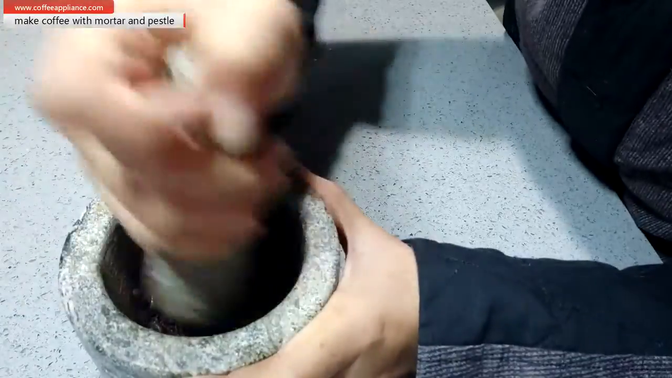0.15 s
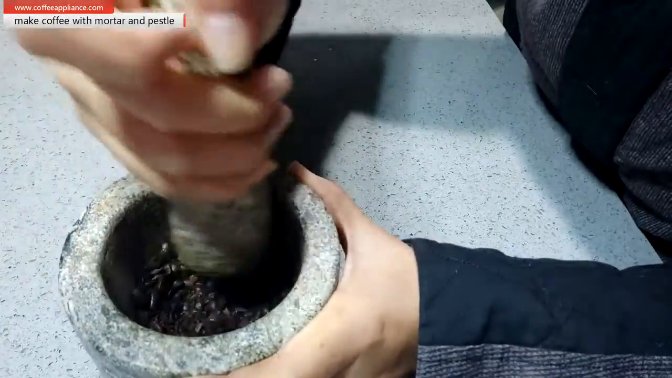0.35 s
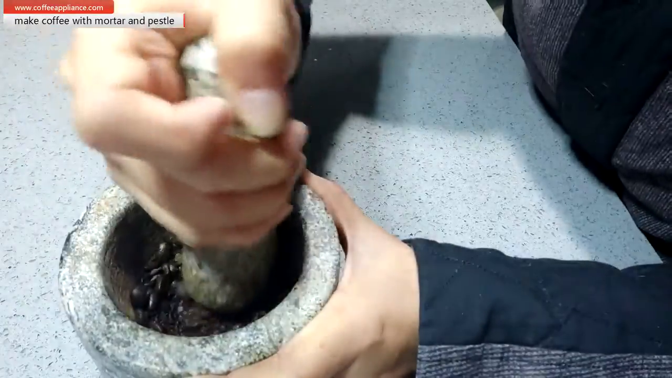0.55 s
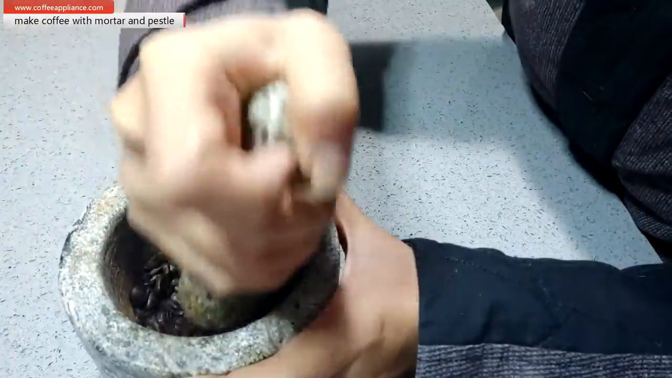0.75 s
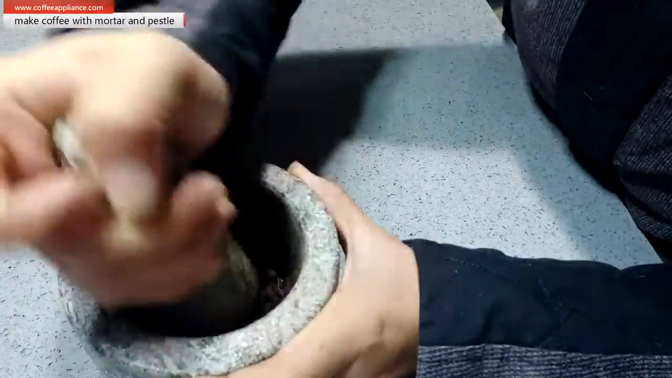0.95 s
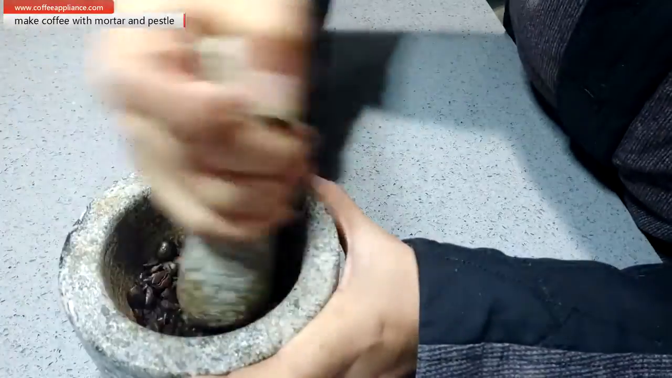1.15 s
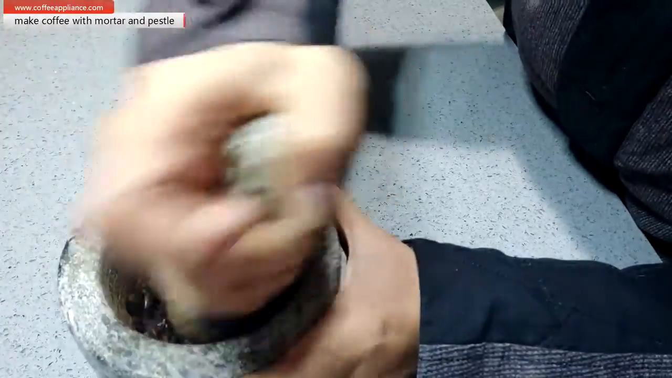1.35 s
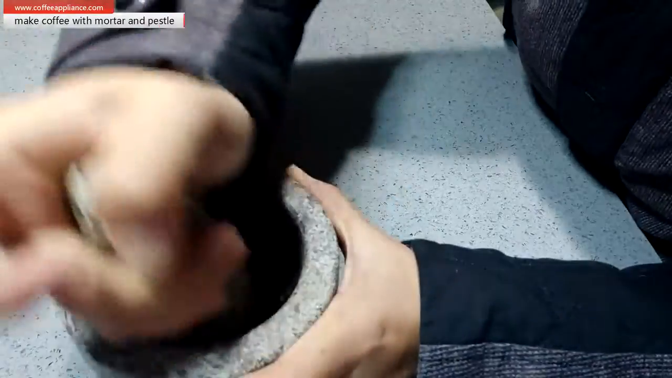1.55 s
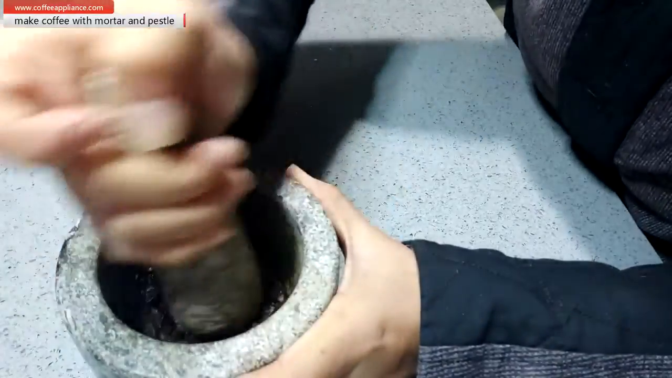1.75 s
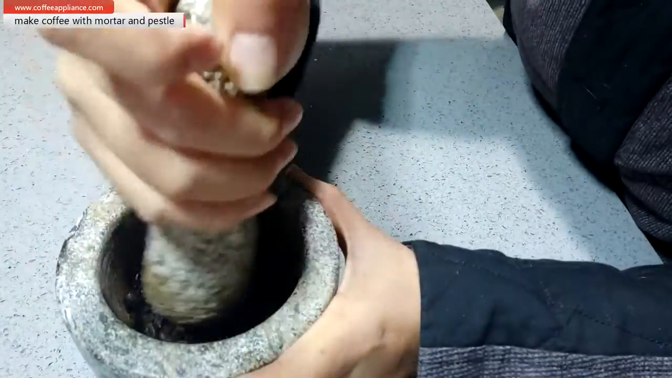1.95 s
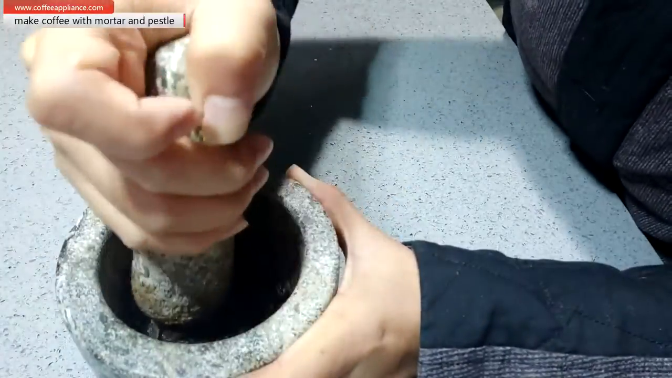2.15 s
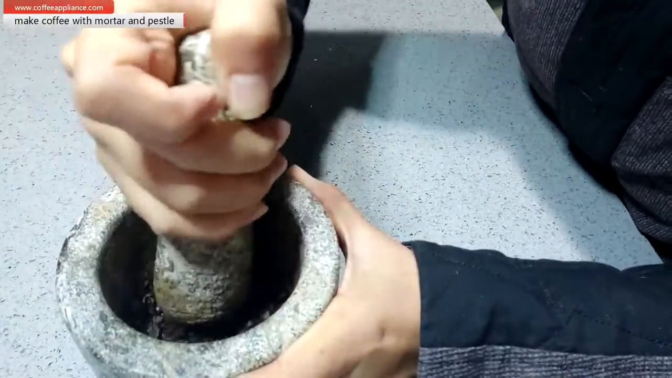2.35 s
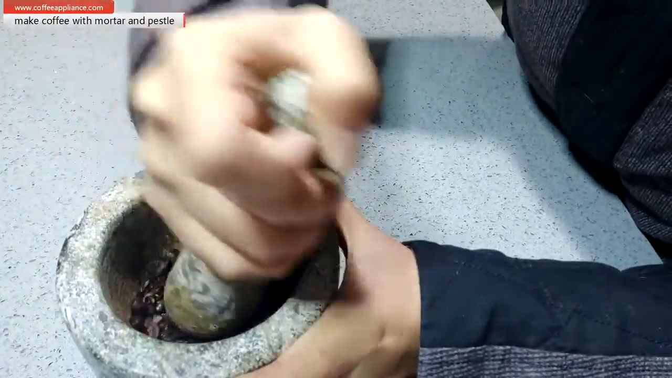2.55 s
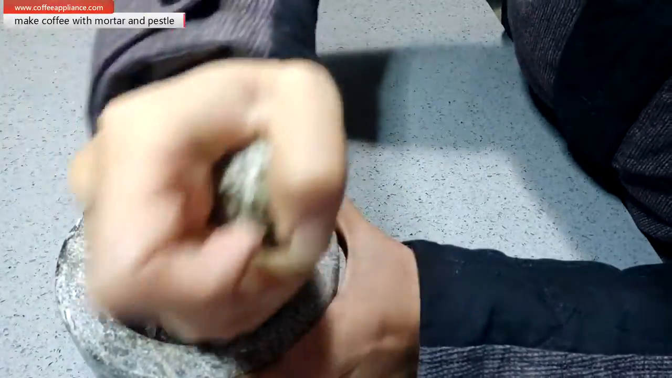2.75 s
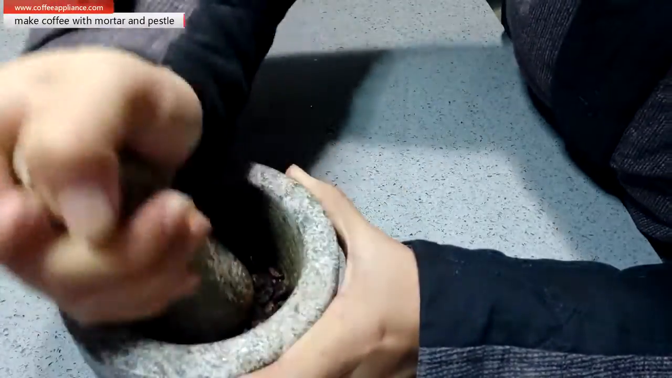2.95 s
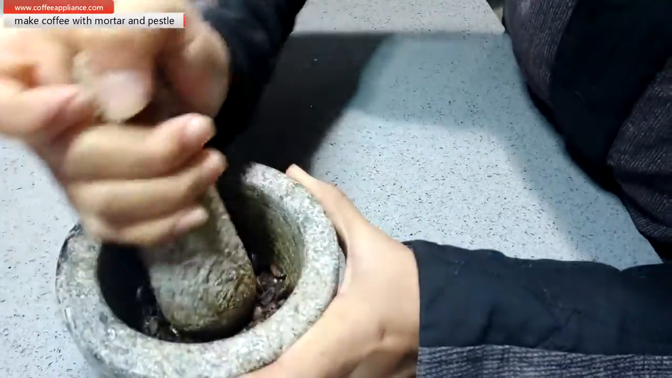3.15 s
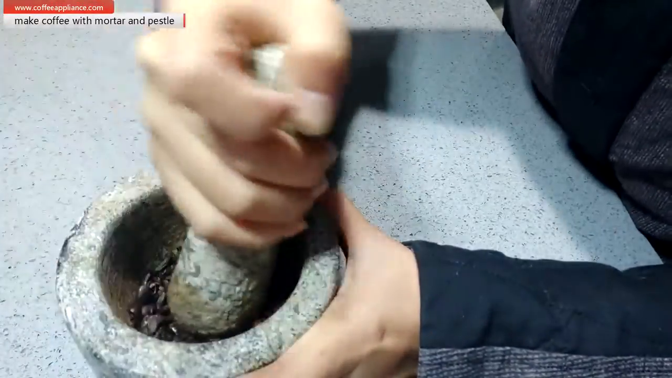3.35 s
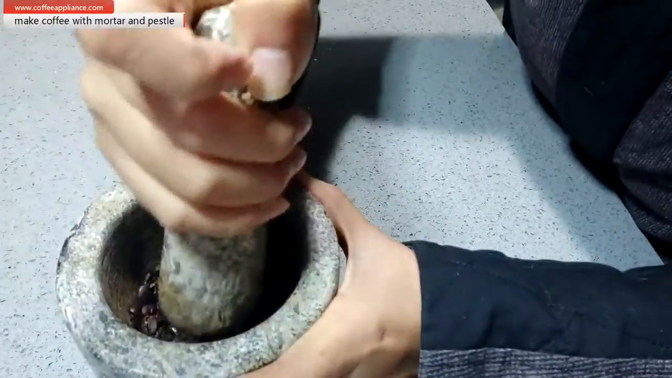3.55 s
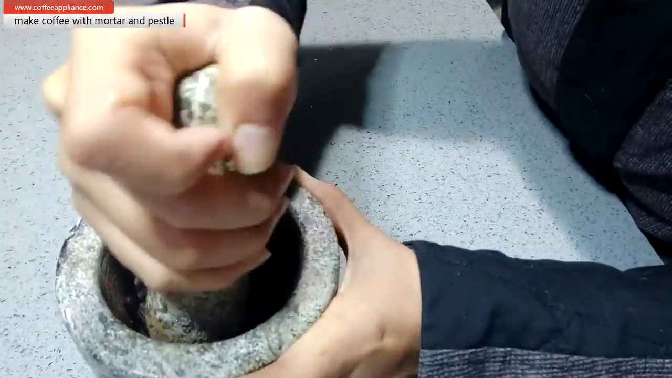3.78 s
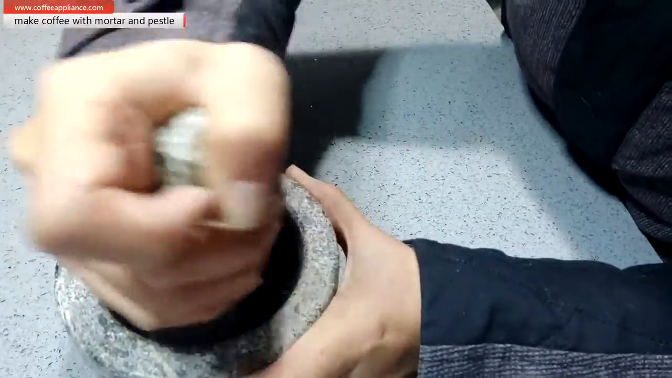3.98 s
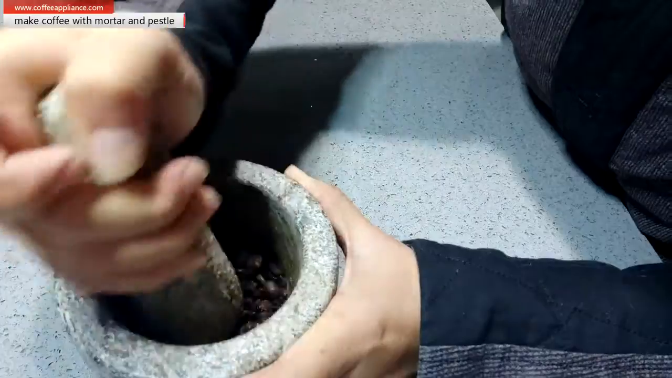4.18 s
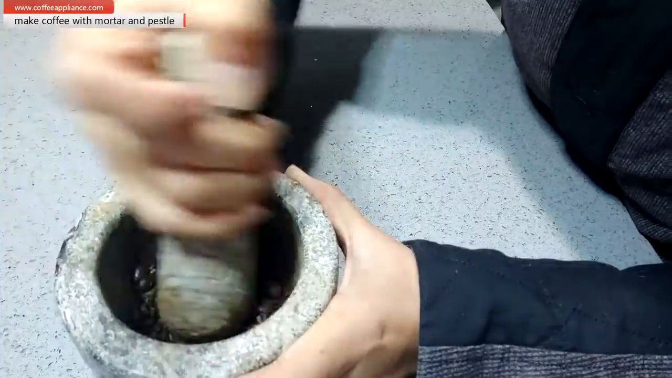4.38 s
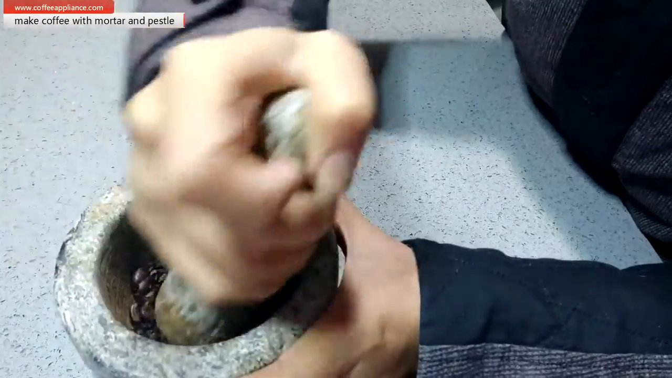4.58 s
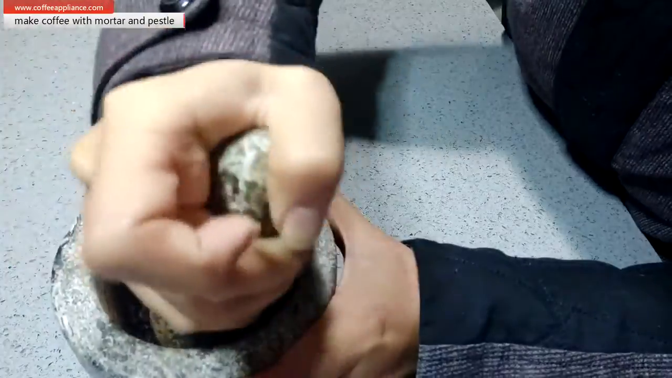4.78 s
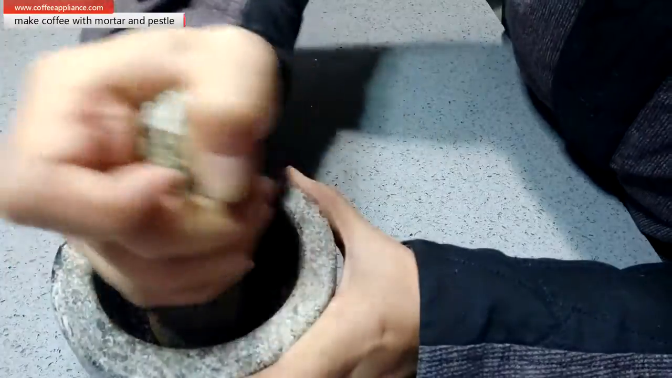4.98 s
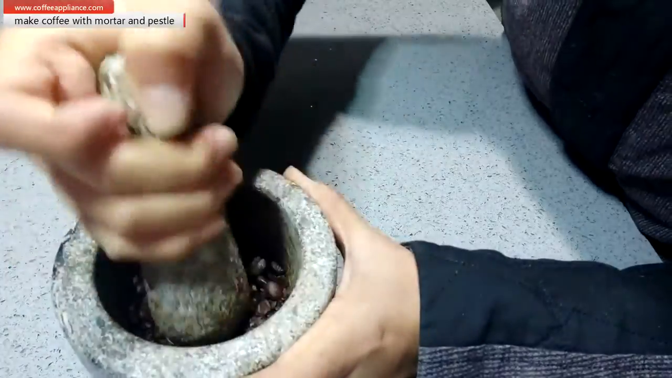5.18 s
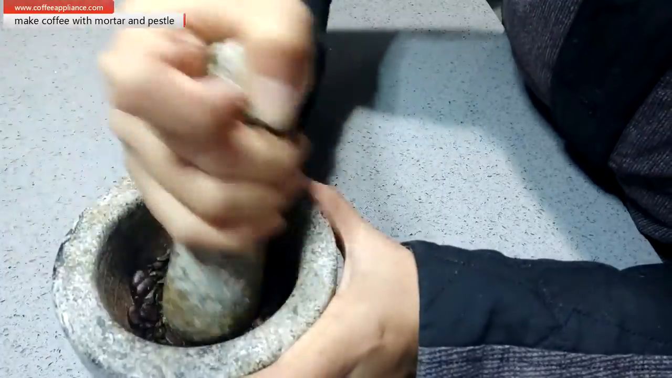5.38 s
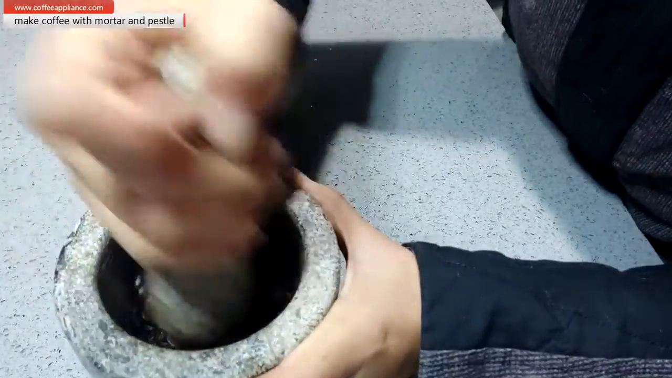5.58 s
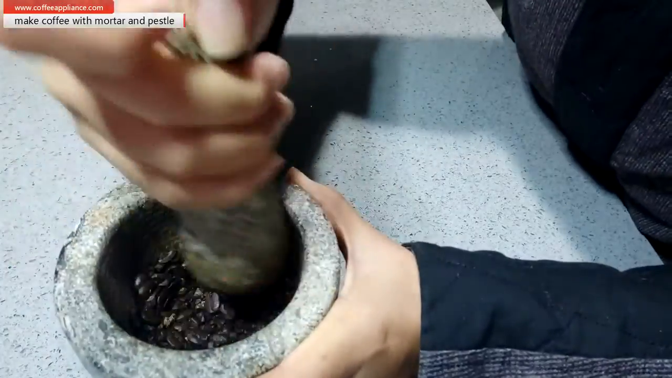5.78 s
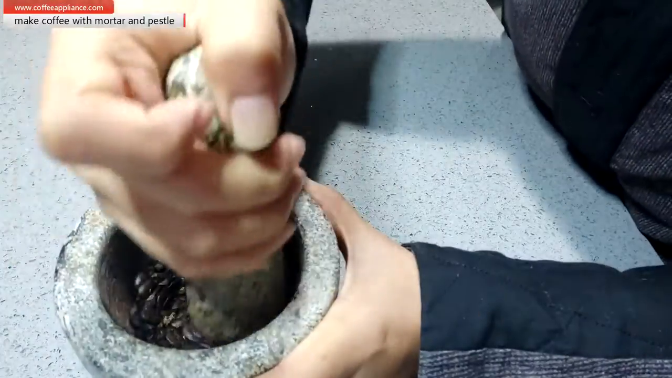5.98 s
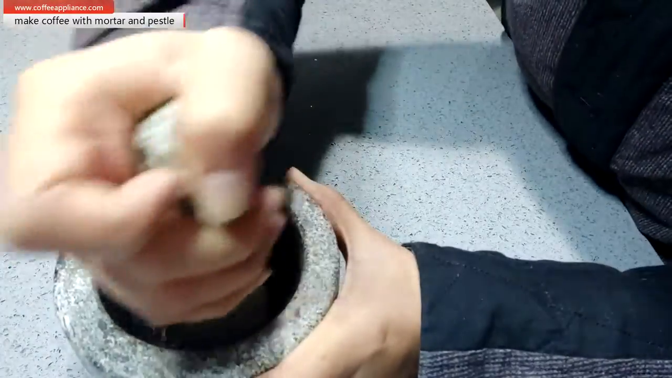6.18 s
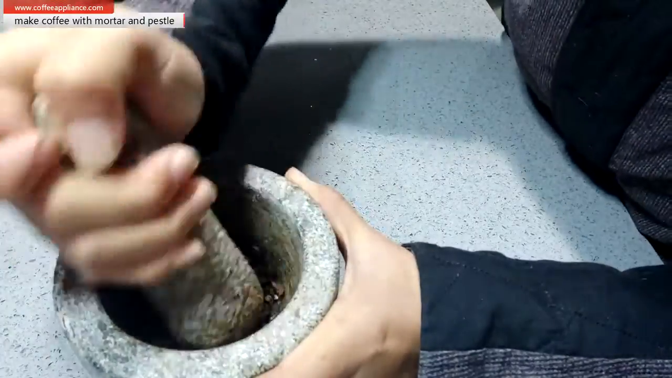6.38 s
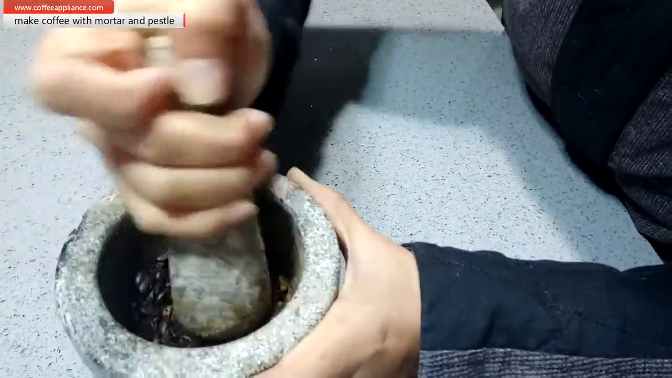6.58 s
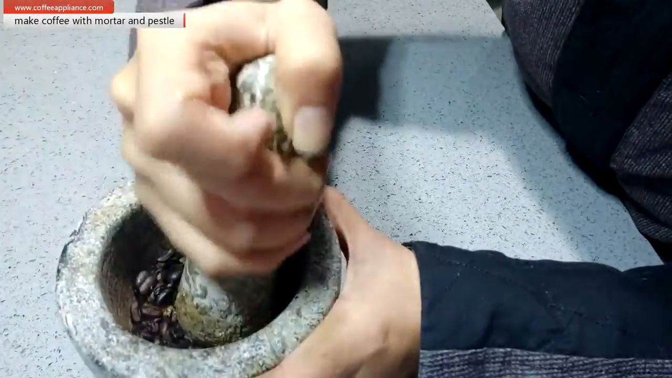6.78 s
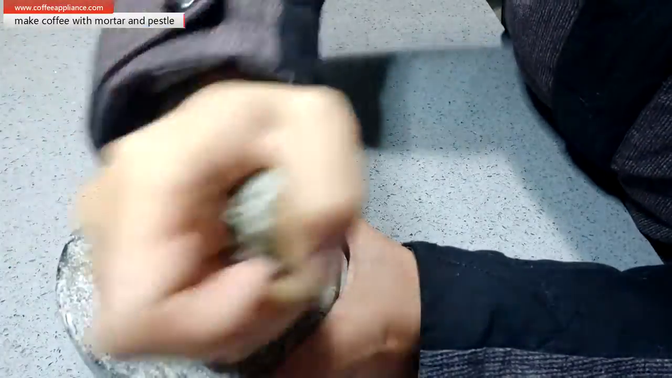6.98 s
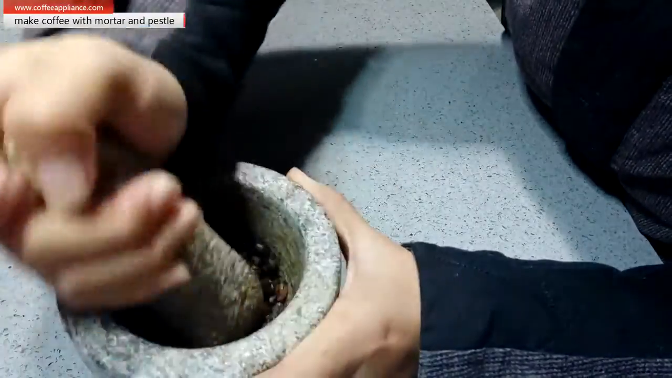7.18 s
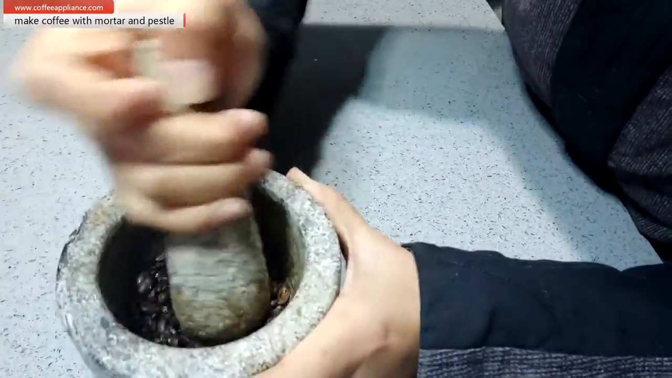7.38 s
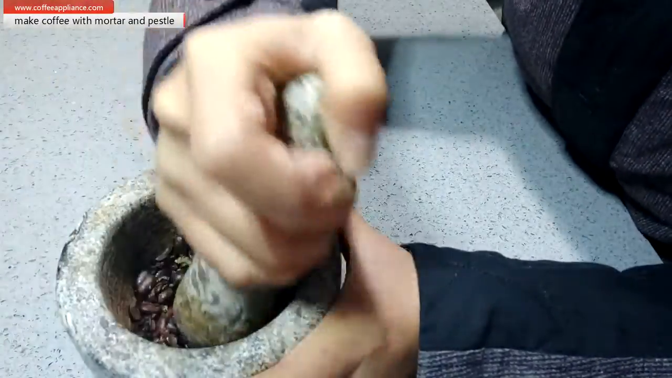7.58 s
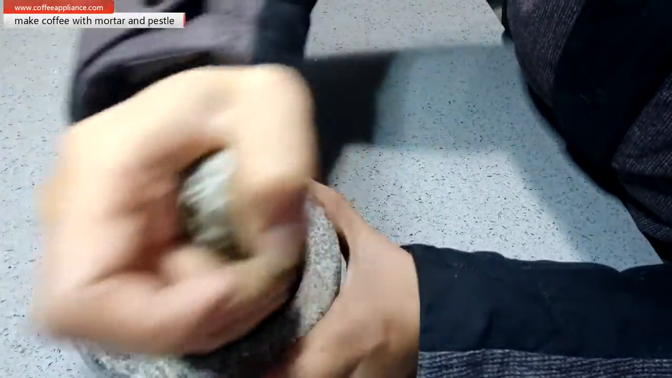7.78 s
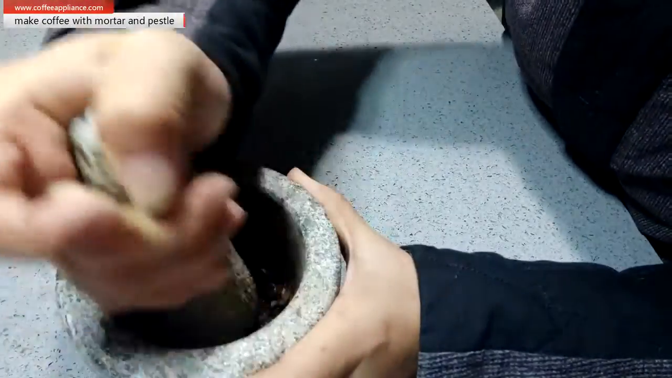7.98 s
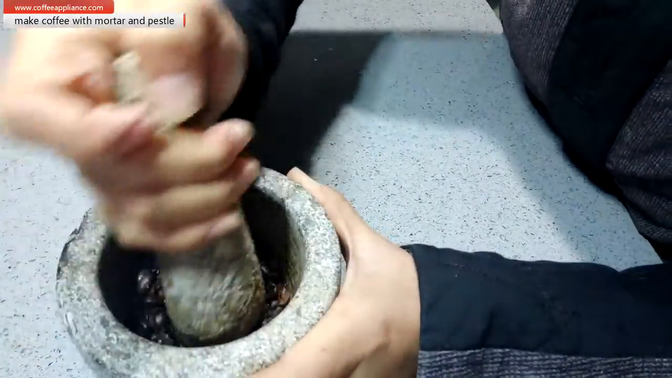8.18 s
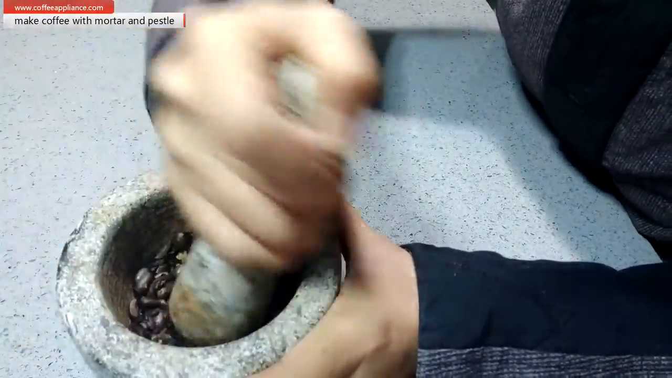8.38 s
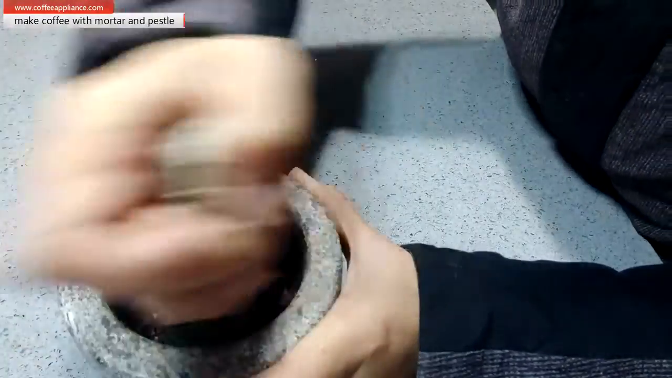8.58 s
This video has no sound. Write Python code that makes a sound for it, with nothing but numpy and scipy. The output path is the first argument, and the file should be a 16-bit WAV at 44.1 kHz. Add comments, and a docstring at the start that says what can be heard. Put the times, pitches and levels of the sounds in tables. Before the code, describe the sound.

A stone pestle works through roasted coffee beans in a stone mortar on a table. Gritty crumbling swells and eases in uneven sweeps, with crisp snaps over a low hollow rumble. Brief lifts leave short gaps, and the pestle sometimes knocks the bowl, most loudly in a quick double clack at the end. Very close, wide and treble-heavy stereo in a small room with faint steady noise.

```python
"""A stone pestle grinds roasted coffee beans in a stone mortar held on a table in a small, softly noisy room.
From the start each sweep swells and eases: crumbs crush in stick-slip bursts, the pestle's pushes excite
mortar and table modes in a hollow rumble, and beans snap as impulses that ring briefly.
The pestle is lifted a few times; from half a second on it sometimes knocks, with the two loudest clacks near
the end. Walls and bowl answer with diffuse reflections, and each microphone port adds its own treble resonance."""
import sys
import numpy as np
from scipy import signal
from scipy.fft import rfft, irfft
from scipy.io import wavfile
from scipy.ndimage import uniform_filter1d

SR = 44100
rng = np.random.default_rng(int(sys.argv[2]) if len(sys.argv) > 2 else 0)


def pcm_store(signal):
    """Save signal as 16-bit PCM."""
    levels = np.round(np.clip(np.atleast_2d(signal), -1, 1) * 32767)
    wavfile.write(sys.argv[1], SR, levels.astype(np.int16).T)


N = 380583  # length in samples
TIME = np.arange(N) / SR  # s
TOP_HZ = 15800  # upper edge of the sound


def undb(db):
    """Decibel law: convert a level in dB to an amplitude gain."""
    return 10 ** (np.asarray(db) / 20)


def unit(x):
    """Energy normalization: scale a response to unit energy."""
    return x / np.sqrt(np.sum(x ** 2, axis=-1, keepdims=True))


def steady(x):
    """Power normalization: scale a signal to rms 1."""
    return x / np.sqrt(np.mean(x ** 2))


def through(x, response):
    """Linear superposition: convolve a sound with an impulse response."""
    convolved = signal.oaconvolve(np.atleast_2d(x), np.atleast_2d(response), axes=-1)
    return convolved[:, :np.shape(x)[-1]]


def colour(points, size=2048):
    """Minimum phase: fold the cepstrum of a (Hz, dB) outline to obtain a causal impulse response."""
    hz, db = np.transpose(points)
    grid_hz = np.maximum(np.arange(size // 2 + 1) * SR / size, 1)
    outline_db = np.interp(np.log(grid_hz), np.log(hz), db)
    cepstrum = irfft(np.log(undb(outline_db)))
    cepstrum[1:size // 2] *= 2
    cepstrum[size // 2 + 1:] = 0
    return irfft(np.exp(rfft(cepstrum)))


def walk(rate_hz):
    """Band-limited fluctuation: smoothed random steps of rms 1, about rate_hz turns a second."""
    hold = max(int(SR / rate_hz), 1)
    steps = np.repeat(rng.standard_normal(N // hold + 1), hold)
    return steady(uniform_filter1d(steps, hold)[:N])


def even(x, span_s):
    """Short-term power: hold a grain stream near power 1 over span_s, keeping its finer bursts."""
    power = uniform_filter1d(np.atleast_2d(x ** 2).mean(axis=0), int(span_s * SR))
    return x / np.sqrt(np.maximum(power, 0) + power.mean() / 100)


def blows(times_s, sizes):
    """Impulsive excitation: one single-sample impulse at each time."""
    at = np.round(np.asarray(times_s) * SR).astype(int)
    return np.bincount(np.clip(at, 0, N - 1), sizes, N)


def grains(rate_hz, spread_db):
    """Random point process: impulses of either sign, many small and a few large."""
    chance = rng.random(N)
    size = np.minimum(rng.exponential(size=N), 4)
    return (chance < rate_hz / SR) * undb(spread_db * size) * rng.choice([-1, 1], N)


def two_ports(x, scatter_db=4.0, lag_samples=5):
    """Interaural-type cues: each fracture reaches the two ports with its own lag and balance."""
    at = np.flatnonzero(x)
    lag = rng.integers(-lag_samples, lag_samples + 1, len(at))
    balance_db = scatter_db * rng.standard_normal(len(at))
    ports = []
    for side in (1, -1):
        arrival_s = (at + side * lag / 2) / SR
        ports.append(blows(arrival_s, x[at] * undb(side * balance_db)))
    return np.array(ports)


def tail(t60_s, build_s):
    """Diffuse field: independent decaying noise at each port, with build-up time constant build_s."""
    t = TIME[:int(min(t60_s, .5) * SR) + 8]
    envelope = undb(-60 * t / t60_s) * (1 - np.exp(-t / build_s))
    return unit(rng.standard_normal((2, len(t))) * envelope)


def scatter(x, t60_s, build_s, moves_hz=12):
    """Time-varying reflection: the echo pattern changes as hand and pestle move over the bowl."""
    hop = int(SR / moves_hz)
    out = np.zeros((2, N + SR))
    fade = np.sin(np.pi * np.arange(2 * hop) / (2 * hop))  # overlapping squares sum to one
    for at in range(0, N, hop):
        piece = x[:, at:at + 2 * hop]
        echo = signal.fftconvolve(piece * fade[:piece.shape[1]], tail(t60_s, build_s), axes=-1)
        out[:, at:at + echo.shape[1]] += echo
    return out[:, :N]


def cushioned(force, soft_hz):
    """First-order low-pass: a layer of grounds lengthens the push and takes off its top."""
    return signal.lfilter(*signal.butter(1, min(soft_hz, SR / 4), fs=SR), force)


# Spectrum of the quiet room. Each row: frequency in Hz, relative spectral level in dB.
ROOM_SPECTRUM = [(30, -9), (150, -5.5), (260, -11), (900, -17), (2000, -29), (5000, -44), (16000, -44.5)]
ROOM_DB = -51.5  # rms level before the ports


def room_tone():
    """Partial coherence: steady room noise whose bass is shared by both ports while its hiss is not."""
    noise = rng.standard_normal((3, N))
    hiss = noise[:2] - cushioned(noise[:2], 560)
    shared_bass = cushioned(noise[2], 460)
    return undb(ROOM_DB) * steady(through(hiss + shared_bass, colour(ROOM_SPECTRUM)))


def swell(times_s, levels_db, rise_s, fall_s):
    """Power envelope: a gesture rises from 60 dB below, passes through its levels and dies away."""
    outline_s = [times_s[0] - rise_s, *times_s, times_s[-1] + fall_s]
    outline_db = [levels_db[0] - 60, *levels_db, levels_db[-1] - 60]
    return undb(np.interp(TIME, outline_s, outline_db, left=-200, right=-200)) ** 2


# Sweeps of the pestle through the beans. Each row: start in seconds, hardest press in seconds,
# end in seconds, relative crushing level in dB, relative level of the mortar's shaking in dB.
PESTLE_SWEEPS = [(0.0, 0.048, 0.21, -35.5, -32), (0.567, 1.23, 1.36, -30.5, -31.5),
                 (1.415, 1.535, 1.82, -30.5, -30.5), (2.314, 2.97, 3.435, -32.5, -32),
                 (3.768, 3.96, 4.0, -33, -33.5), (4.104, 4.55, 4.84, -29.5, -27.5),
                 (5.067, 5.36, 5.5, -29, -28.5), (5.963, 6.32, 6.52, -36.5, -36),
                 (6.505, 6.903, 7.13, -27.5, -28), (7.142, 7.317, 7.82, -29, -30.5),
                 (7.922, 8.523, 8.48, -34.5, -32.5)]
# Pieces of bean caught and crunched to powder. Each row: start in seconds, length in seconds,
# relative crushing level in dB, relative level of the mortar's shaking in dB.
CAUGHT_PIECES = [(0.02, 0.042, -28, -32), (0.197, 0.016, -36.5, -33), (.603, 0.036, -24.5, -29.5),
                 (0.671, 0.052, -26.5, -30), (0.788, 0.041, -32, -32.5), (0.934, 0.068, -26, -32),
                 (1.007, 0.0091, -31, -36), (1.172, .055, -21.5, -32.5), (1.268, 0.063, -27, -26),
                 (1.448, 0.052, -29.5, -36), (1.554, 0.021, -37, -25.5), (1.735, 0.038, -33, -37),
                 (1.872, 0.02, -43.5, -43), (1.922, 0.022, -40, -37), (2.195, .025, -26, -34.5),
                 (2.335, 0.04, -29.5, -33.5), (2.417, 0.019, -25.5, -33), (2.48, 0.044, -31, -36),
                 (2.563, 0.042, -28, -31), (2.928, 0.1, -26.5, -26.5), (3.147, 0.032, -27.5, -33),
                 (3.378, 0.021, -33.5, -54), (3.486, 0.012, -34, -54), (3.794, 0.043, -31, -33.5),
                 (3.924, .065, -31, -30), (4.122, 0.078, -31, -29), (4.305, 0.013, -33.5, -28),
                 (4.342, .075, -24.5, -32), (4.508, 0.091, -25, -23), (4.707, .04, -26, -23.5),
                 (4.951, 0.026, -35.5, -25.5), (5.05, 0.045, -29.5, -26.5), (5.43, 0.042, -29, -27),
                 (5.552, 0.04, -32, -32), (5.642, .012, -39, -51), (5.974, .055, -32, -36.5),
                 (6.09, 0.0081, -30, -40), (6.135, 0.037, -32.5, -42), (6.248, 0.017, -31.5, -23.5),
                 (6.302, .025, -29, -36), (6.522, 0.058, -29, -35.5), (6.604, 0.027, -28, -42),
                 (6.789, 0.027, -28, -26.5), (7.051, 0.032, -25.5, -25), (7.154, 0.018, -32.5, -24),
                 (7.222, 0.031, -28.5, -26.5), (7.628, 0.021, -34, -26), (7.805, 0.046, -28.5, -28.5),
                 (8.148, 0.033, -28.5, -25.5), (8.274, 0.026, -36.5, -48), (8.38, 0.018, -28, -45),
                 (8.463, 0.064, -28, -27), (8.544, 0.073, -38, -27)]
# a sweep bites, swells to its hardest point, eases off and lets go
BITE_S, SWELL_DB, EASE_DB, LET_GO_S = 0.13, 8.5, 8, 0.22
CRUNCH_ATTACK_S, CRUNCH_RELEASE_S = 0.051, 0.093


def effort(column):
    """Addition of powers: sweeps plus short crunches give the crushing (0) or shaking (1) level in dB."""
    power = 0
    for start, hardest, end, *levels in PESTLE_SWEEPS:
        db = levels[column]
        sweep_db = [db - SWELL_DB, db, db - EASE_DB]
        power = power + swell([start, hardest, end], sweep_db, BITE_S, LET_GO_S)
    for start, length, *levels in CAUGHT_PIECES:
        crunch_db = [levels[column]] * 2
        power = power + swell([start, start + length], crunch_db, CRUNCH_ATTACK_S, CRUNCH_RELEASE_S)
    return 10 * np.log10(power)


def fragment(hz, skirt_db=-9, octaves=1.0):
    """Damped resonance: a brittle piece of bean rings for a cycle or two around its own pitch."""
    outline = [(hz / 2 ** octaves, skirt_db), (hz, 0), (hz * 2 ** octaves, skirt_db)]
    return unit(colour(outline, size=256))


def crushing(level_db, rate_hz=600, spread_db=2.5, slip_db=6, slip_rate_hz=85, patchy_db=1.5,
             gain_db=-14, count=6):
    """Stick-slip friction: crumbs of several sizes fracture in bursts as the pestle sticks and slips."""
    slipping = np.tanh(2 * walk(slip_rate_hz) - 1.8)  # -1 stuck, +1 sliding; mostly stuck
    crumbs = 0
    for hz in np.geomspace(4000, 14000, count):
        sizes = grains(rate_hz, spread_db) * undb(slip_db * slipping + patchy_db * walk(35))
        crumbs = crumbs + through(two_ports(sizes), fragment(hz))
    return even(crumbs, 0.052) * undb(level_db + gain_db)


def judder(level_db, rate_hz=260, spread_db=2.5, gain_db=-1.0):
    """Random forcing: the pestle jerks over broken beans, a few hundred small pushes a second."""
    return even(grains(rate_hz, spread_db), 0.054) * undb(level_db + gain_db)


# Modes of mortar, pestle and table together.
# Each row: frequency in Hz, relative level in dB, undamped 60 dB decay time in seconds.
BODY_MODES = [(42.4, -18.5, 0.82), (63, -13, 0.51), (89.2, -10, 0.43), (163, -9.5, 0.036),
              (188.5, -9.5, 0.52), (235.1, 3.5, .19), (266, -1, 0.056), (299.6, -6.5, 0.12),
              (423, -7.5, 0.056), (491, -13, 0.039), (562, -18.5, 0.12), (636.7, -11, 0.14),
              (825, -18.5, 0.28), (951, -8.5, 0.067), (1142, -19.5, 0.05), (1411, -18.5, 0.091),
              (1710, -31, 0.15)]


def mortar(force, damping=1, apart_hz=1100):
    """Modal superposition: decaying sines ring together, the higher ones out of step at the two ports."""
    t = TIME[:SR // 2]
    ring = 0
    for k, (hz, db, t60_s) in enumerate(BODY_MODES):
        half_phase = min(0.038 + hz / apart_hz, np.pi / 2)  # rad
        shift = np.array([[.5], [-.5]]) * (-1) ** (k // 2) * half_phase
        decay = np.exp(-np.log(1000) * damping * t / t60_s)
        mode = unit(np.sin(2 * np.pi * hz * t + shift) * decay)
        ring = ring + (-1) ** k * undb(db) * mode
    return through(force, unit(ring))


# Spectrum of stone knocking or scraping through grounds. Each row: frequency in Hz, relative level in dB.
CLACK_SPECTRUM = [(120, -25.5), (300, 3), (600, 3), (1000, 0.5), (1600, -13), (2400, -28), (5000, -55),
                  (16000, -45)]


def rumble(shake_db, crack_s, jolt_db):
    """Forced vibration: pushes and drops through breaking beans ring the mortar, with a dull scrape."""
    pushes = judder(shake_db)
    jolts = cushioned(blows(crack_s, undb(jolt_db + 27.0)), 1100)
    body = mortar(cushioned(pushes + jolts, 1580))
    # stone rubbing on stone fills in between the modes
    scrape = through(undb(-14.5) * pushes, unit(colour(CLACK_SPECTRUM)))
    scrape = scrape + undb(4.0) * scatter(scrape, 0.043, 0.0019)
    walls = undb(-7.5) * scatter(scrape, 0.36, 0.0024)
    return body + scrape + walls


def chips(crush_db, above_db=3.0, spread_db=2.0, loudest_db=-22, ring_hz=12000, jolt_db=-12, count=60):
    """Load-dependent fracture: small pieces snap at random, louder the harder the pestle presses."""
    when, size, pitch = rng.random((count, 3)).T
    s = (np.arange(count) + when) / count * TIME[-1]
    db = np.interp(s, TIME, crush_db) + above_db + spread_db * (2 * size - 1)
    db = np.minimum(db, loudest_db)
    piece_hz = np.minimum(ring_hz * 2 ** (pitch - .5), TOP_HZ)
    return np.column_stack([s, db, piece_hz, db + jolt_db])


# Whole beans breaking. Each row: time in seconds, relative snap level in dB, ring of the piece in Hz,
# relative level in dB of the jolt as the pestle drops through it.
BEAN_CRACKS = [(.038, -23.5, 8240, -29), (.125, -22.5, 9400, -33.5), (.771, -22, 11300, -21),
               (.839, -19, 8600, -47), (1.064, -16, 7100, -20), (1.116, -17, 11900, -28),
               (1.129, -13, 13100, -34), (1.217, -20, 6500, -35), (1.227, -15, 7400, -30),
               (1.328, -18, 8500, -26), (1.408, -34, 13000, -45), (1.527, -17, 5400, -28),
               (1.579, -21.5, 10600, -33), (1.672, -19.5, 7400, -27), (1.792, -19.5, 11700, -36),
               (2.332, -16.5, 6400, -26), (2.494, -21, 10600, -33), (2.613, -16, 10400, -39),
               (2.646, -12, 11500, -22), (2.703, -14, 5070, -36), (2.724, -12.5, 13000, -37),
               (2.783, -22, 14000, -31), (2.832, -25, 9700, -38), (2.956, -13, 7600, -32),
               (3.099, -18.5, 7000, -40), (3.142, -10.5, 4800, -43), (3.16, -19, 10000, -29.5),
               (3.221, -13.5, 13300, -28.5), (3.297, -22, 6100, -52), (3.425, -20, 11700, -53),
               (3.756, -24.5, 12600, -53), (3.949, -17, 6600, -32), (4.065, -27, 9750, -30),
               (4.182, -14, 5700, -31), (4.253, -17, 7800, -27), (4.388, -13, 4160, -37),
               (4.407, -21, 8600, -44), (4.494, -12.5, 5400, -29), (4.618, -15.5, 8200, -39),
               (4.697, -14.5, 5660, -21.5), (4.72, -15.5, 5970, -38), (4.734, -16, 7600, -39),
               (4.79, -17, 9900, -41), (4.831, -22, 11400, -42), (4.956, -15.5, 8100, -26),
               (5.047, -12.5, 9200, -21), (5.172, -22.5, 5500, -26.5), (5.24, -20, 9600, -38),
               (5.279, -18, 7500, -32), (5.31, -23, 7660, -47), (5.351, -15, 10600, -27),
               (5.471, -23, 9200, -28), (6.25, -18, 10000, -40), (6.531, -15.5, 6540, -21.5),
               (6.7, -11, 5600, -26), (6.769, -15, 9300, -30), (6.868, -10, 4300, -33),
               (6.884, -20, 5600, -27), (6.899, -17, 7700, -49), (6.927, -13.5, 6850, -23),
               (7.249, -22, 8600, -32), (7.32, -16.5, 5770, -32), (7.354, -14.5, 6120, -28),
               (7.366, -16, 3730, -30), (7.516, -17, 4330, -27.5), (7.559, -17.5, 7300, -33),
               (7.635, -16.5, 9150, -33), (7.723, -17, 7100, -24), (7.811, -18.5, 6040, -25.5),
               (8.149, -20, 6600, -34), (8.387, -16, 7600, -44), (8.51, -19.5, 9800, -29)]


def fractures(crush_db):
    """Brittle failure: whole beans and smaller chips together, as columns of time, snap, ring and jolt."""
    return np.vstack([BEAN_CRACKS, chips(crush_db)]).T


def snaps(times_s, db, ring_hz, snap_db=6, split_db=-7, split_s=.003, crumble_db=-7, crumble_t60_s=0.071):
    """Cascading fracture: a bean snaps, splits again within milliseconds, and its pieces crumble."""
    t = TIME[:SR // 16]
    out = np.zeros((2, N + 2 * len(t)))
    pieces = steady(two_ports(grains(1800, 3.7))) * undb(crumble_db)
    fading = unit(undb(-60 * t / crumble_t60_s))
    chances = rng.random((len(times_s), 3))
    for s, level_db, hz, (wait, size, side) in zip(times_s, db, ring_hz, chances):
        at = int(np.clip(s * SR, 0, N - len(t)))
        burst = pieces[:, at:at + len(t)] * fading
        split_delay = int(split_s * (.2 + wait) * SR)
        # opposite lags at the ports, in samples, place the bean to one side
        for port, lag in enumerate((round(6 * side), round(6 - 6 * side))):
            burst[port, lag] += 1
            burst[port, min(split_delay - lag, len(t) - 1)] += undb(split_db * (0.5 + size))
        ringing = through(burst, fragment(hz, skirt_db=-8))
        out[:, at:at + len(t)] += undb(level_db + snap_db) * ringing
    return out[:, :N]


# Spectrum of bean fracture. Each row: frequency in Hz, relative level in dB.
FRACTURE_SPECTRUM = [(200, -9), (900, 1.5), (2000, 1), (3000, 4.5), (4200, 3), (6000, 3.5), (10000, 2),
                     (16000, 7)]


def crunch(crush_db, crack_s, snap_db, ring_hz):
    """Direct and reflected sound: bowl and hand scatter the fractures at once, the walls a little later."""
    broken = crushing(crush_db) + snaps(crack_s, snap_db, ring_hz)
    direct = through(broken, colour(FRACTURE_SPECTRUM))
    bowl = undb(-8) * scatter(direct, .007, .0006)
    walls = undb(-7.5) * scatter(direct, .28, .001)
    return direct + bowl + walls


# Pestle knocks on the bowl. Each row: time in seconds, relative clack level in dB,
# relative thud level in dB, relative level of the bare stone click in dB.
BOWL_KNOCKS = [(0.499, -18, -17, -21), (1.094, -25, -29, -51), (1.361, -17, -14.5, -58),
               (4.547, -37, -11, -55), (4.696, -25.5, -20, -48), (5.925, -19, -17, -28),
               (6.258, -22, -19, -48), (7.272, -21, -36, -47), (8.535, -9, -9.5, -60),
               (8.560, -7, -22, -62)]
# Spectrum of bare stone on stone. Each row: frequency in Hz, relative level in dB.
STONE_SPECTRUM = [(300, -17), (1500, 14.5), (2100, 5), (2700, 10), (3400, -9.5), (5000, -17), (16000, -61)]


def knocks(chatter_db=-1, chatter_t60_s=0.033, pressed=2):
    """Impact excitation: the pestle clicks, chatters on the wall and thumps the bowl, damping it as it presses."""
    s, clack_db, thud_db, stone_db = np.transpose(BOWL_KNOCKS)
    landing = blows(s, undb(clack_db + 17))
    power_fade = unit(undb(-60 * TIME[:SR // 4] / chatter_t60_s)) ** 2
    chatter_power = np.maximum(through(landing ** 2, power_fade)[0], 0)
    chatter = np.sqrt(chatter_power) * even(grains(1500, 1.2), 0.014)
    clack = through(landing + undb(chatter_db) * chatter, unit(colour(CLACK_SPECTRUM)))
    thud = mortar(cushioned(blows(s, undb(thud_db + 19.0)), 900), damping=pressed)
    click = through(blows(s, undb(stone_db + 21)), unit(colour(STONE_SPECTRUM)))
    # the bowl scatters the clack at once; the walls answer clack and click
    clack = clack + undb(0.5) * scatter(clack, .03, 0.0022)
    walls = scatter(undb(-1.5) * clack + undb(-5.5) * click, .34, 0.00056)
    return clack + thud + click + walls


HOLD_DB = -58  # relative level: the hand that steadies the mortar keeps it faintly stirring


def scene():
    """Superposition of sources: fractures from the bowl, rumble through the mortar, knocks and room noise."""
    crush_db = effort(0)
    shake_db = np.maximum(effort(1), HOLD_DB)
    crack_s, snap_db, ring_hz, jolt_db = fractures(crush_db)
    grinding = crunch(crush_db, crack_s, snap_db, ring_hz) + rumble(shake_db, crack_s, jolt_db)
    return grinding + knocks() + room_tone()


# Responses of the two microphone ports. Each row: frequency in Hz, gain in dB.
LEFT_RESPONSE = [(100, 2.5), (1000, -0.5), (2000, 3.5), (3200, 6.5), (4800, 11), (6300, 16.5), (7500, 12.5),
                 (9000, 7), (12000, 3.5), (16000, 0.5)]
RIGHT_RESPONSE = [(100, 1), (1000, -1.5), (2200, 3), (4000, 6.5), (6500, 8), (8200, 12.5), (9200, 20),
                  (9800, 24.5), (10800, 19), (12500, 13), (16000, 10.5)]


def record(dry):
    """Port resonance and soft saturation: each port colours its channel, peaks are rounded, the top is cut."""
    sound = through(dry, np.array([colour(LEFT_RESPONSE), colour(RIGHT_RESPONSE)]))
    sound = .85 * np.tanh(sound / .85)
    return signal.sosfilt(signal.ellip(10, .2, 70, TOP_HZ, fs=SR, output="sos"), sound)


dry = scene()
out = record(dry)
pcm_store(out)
```